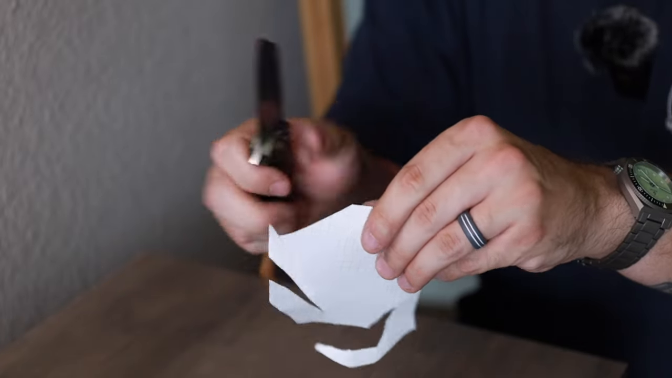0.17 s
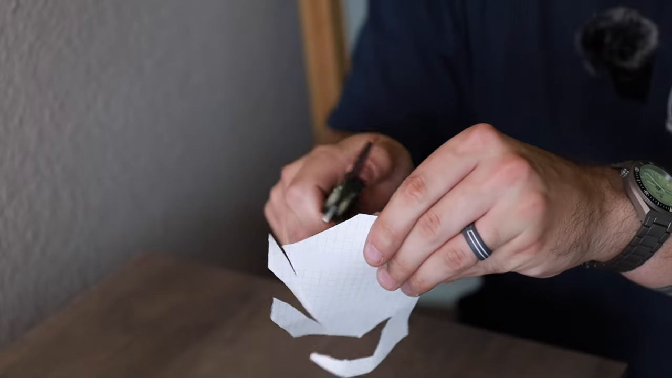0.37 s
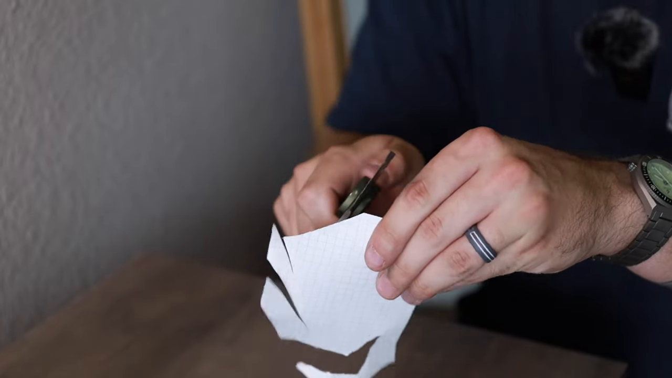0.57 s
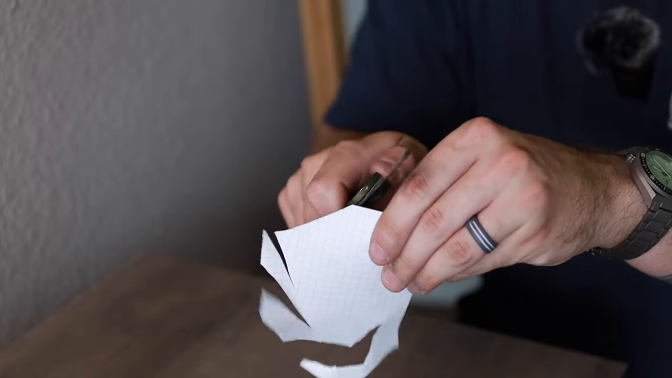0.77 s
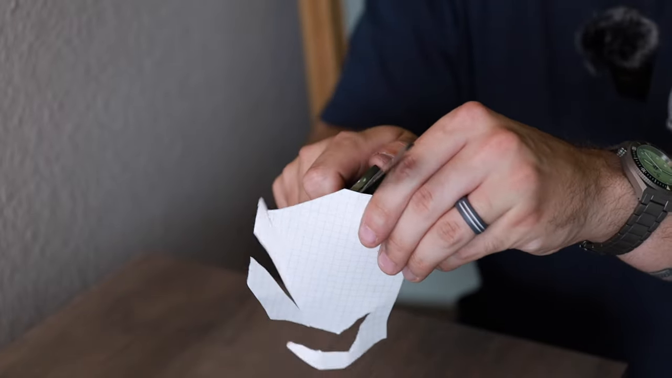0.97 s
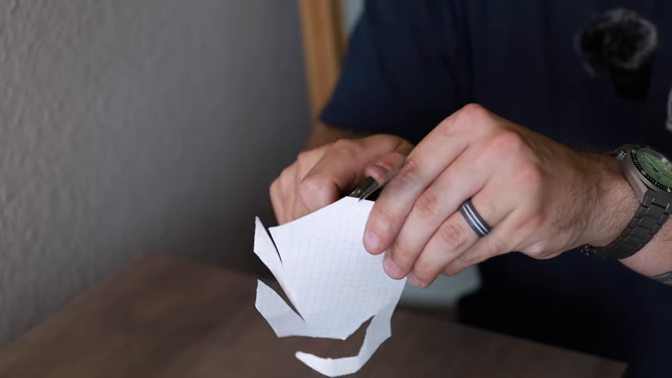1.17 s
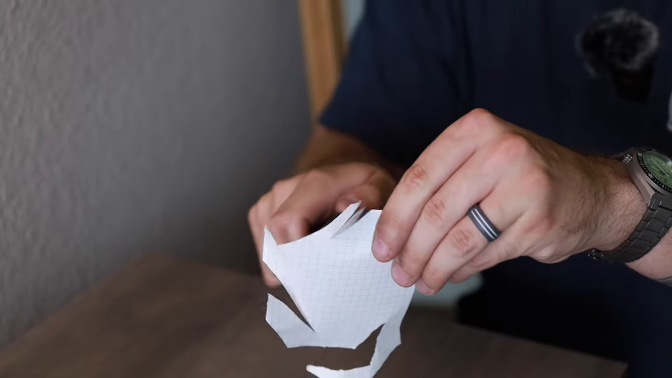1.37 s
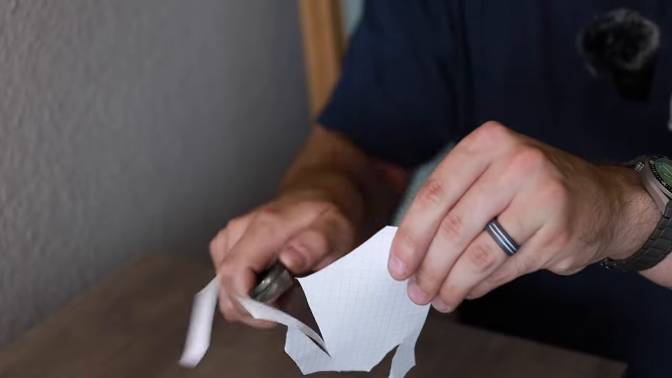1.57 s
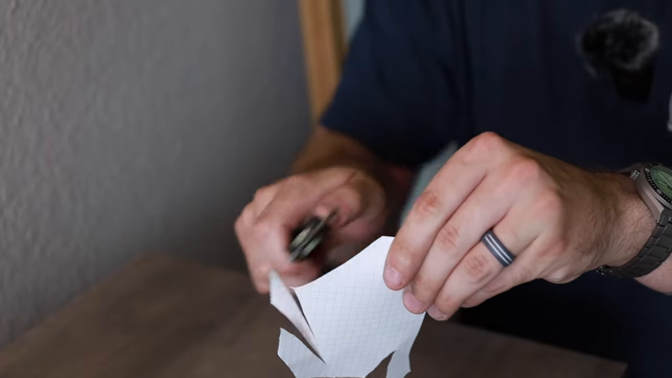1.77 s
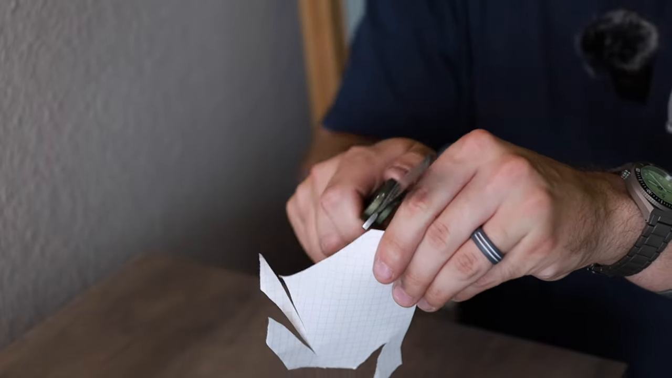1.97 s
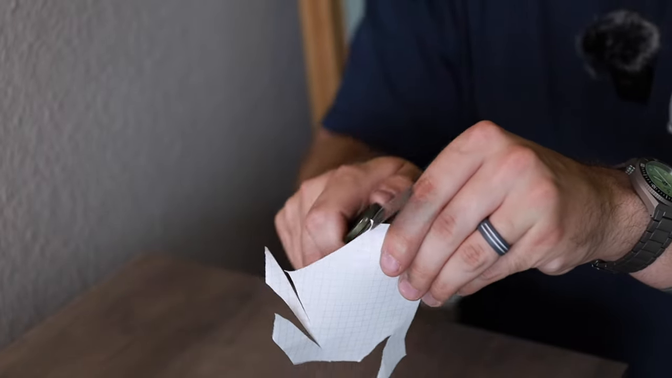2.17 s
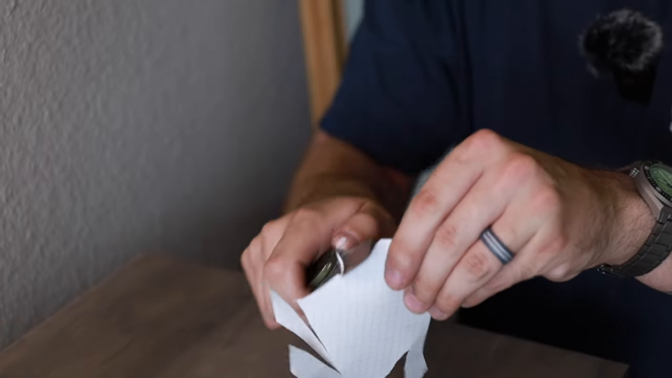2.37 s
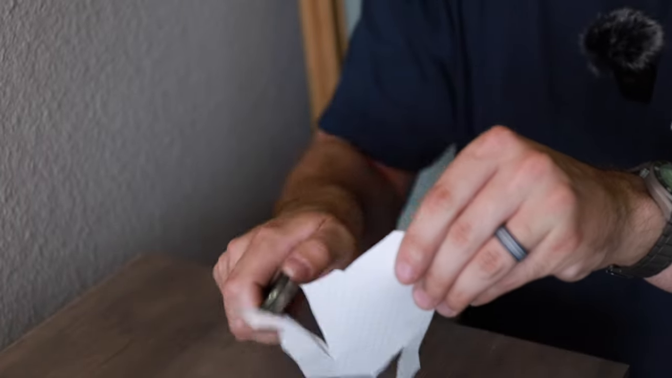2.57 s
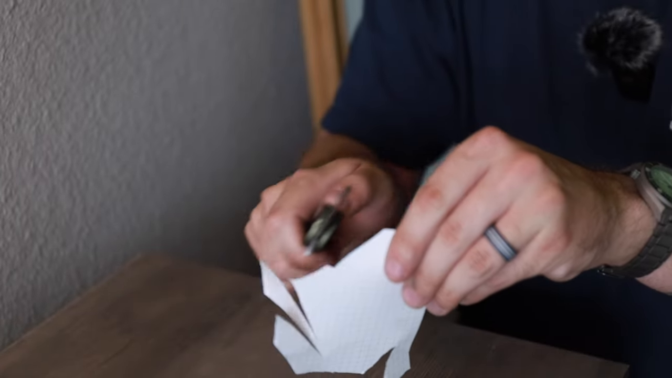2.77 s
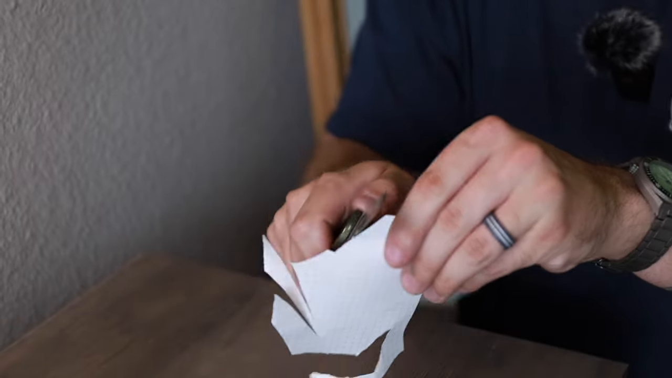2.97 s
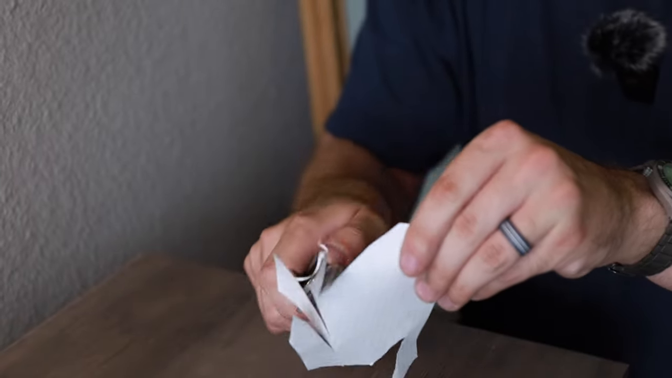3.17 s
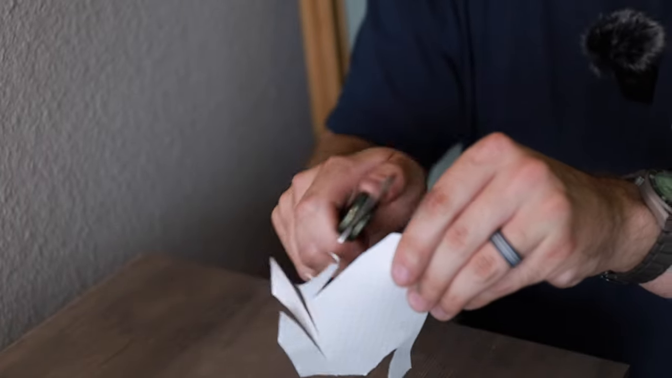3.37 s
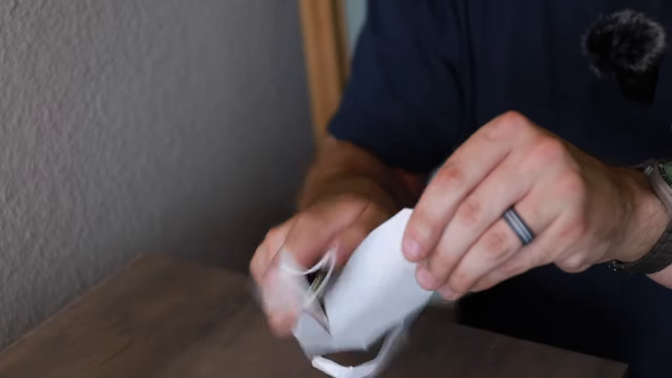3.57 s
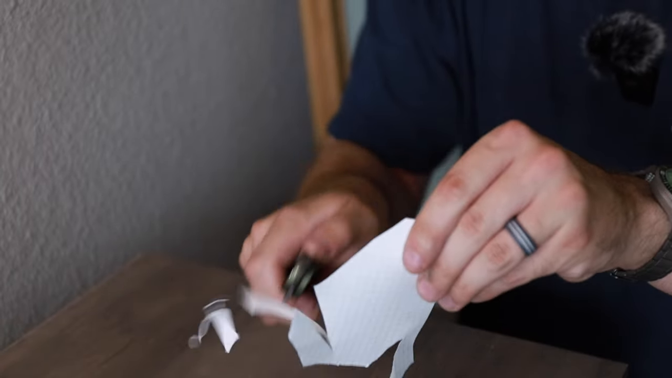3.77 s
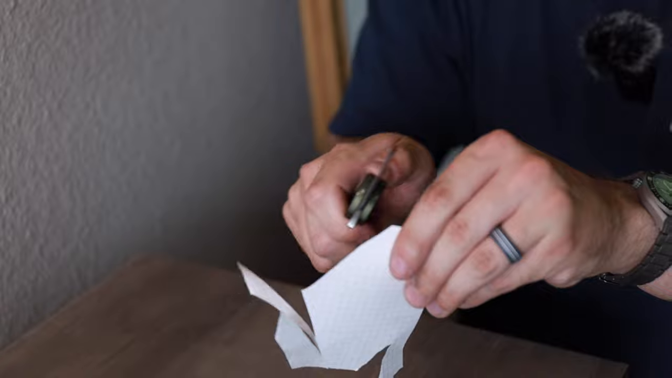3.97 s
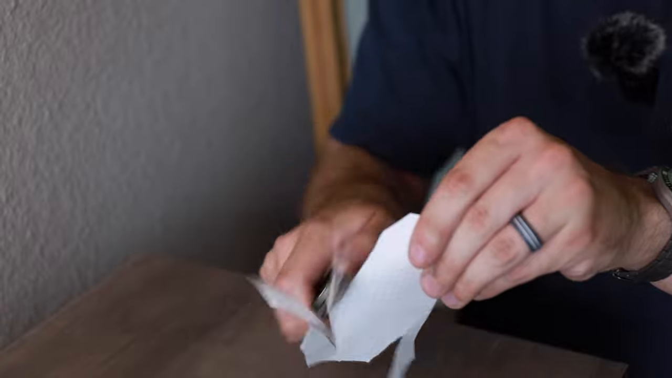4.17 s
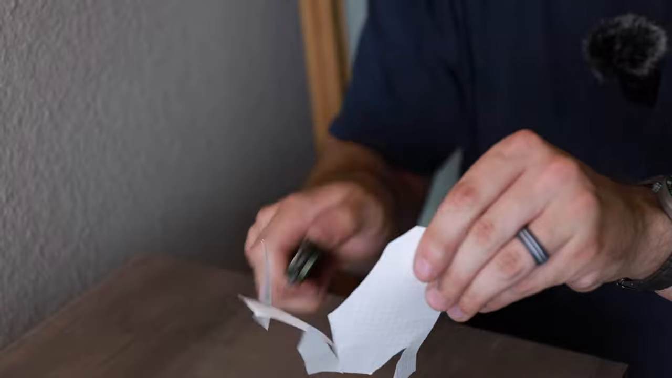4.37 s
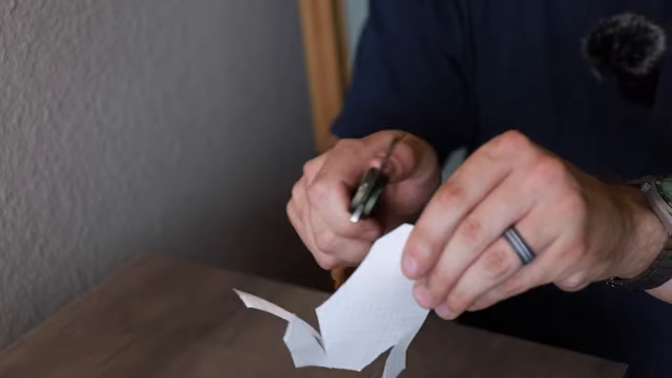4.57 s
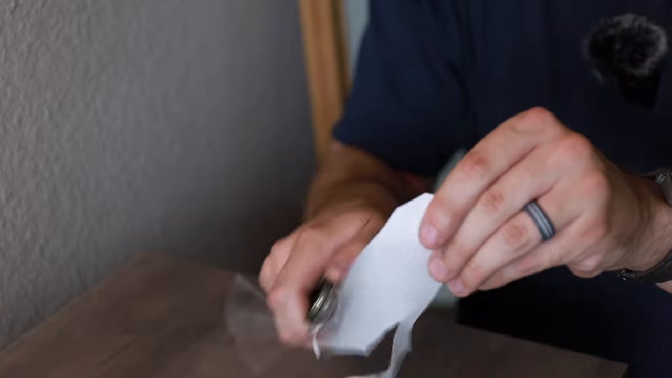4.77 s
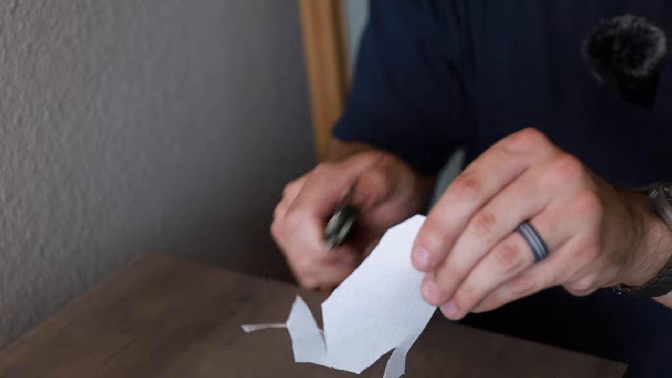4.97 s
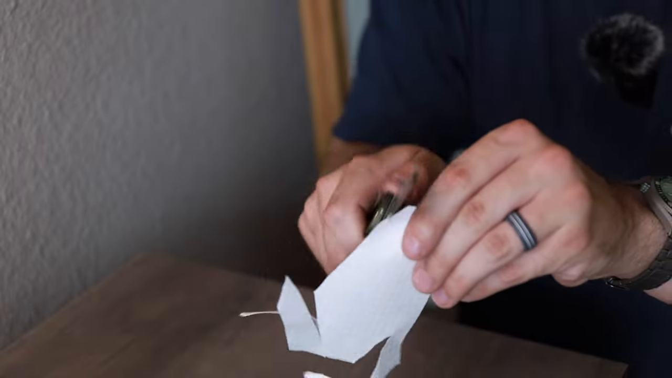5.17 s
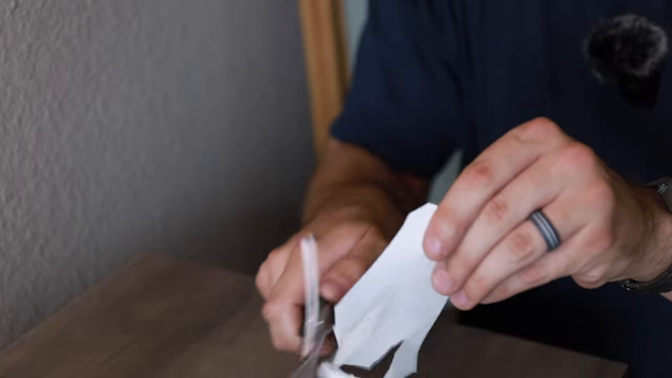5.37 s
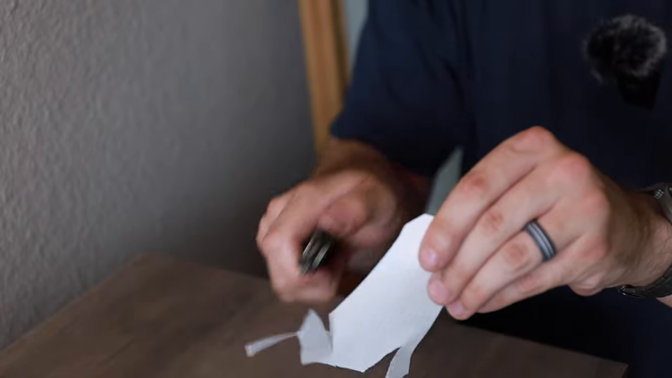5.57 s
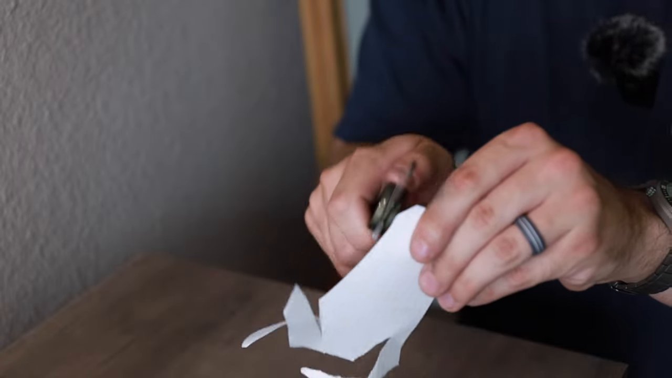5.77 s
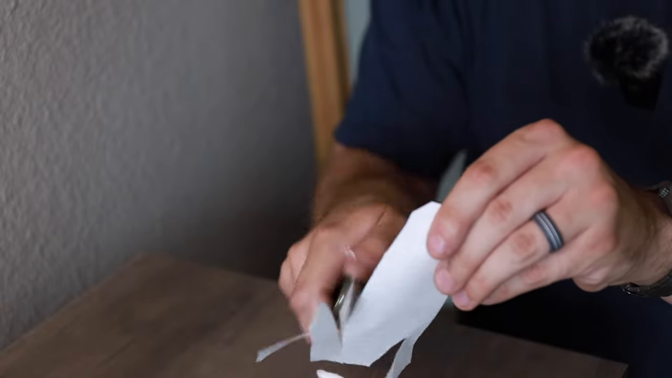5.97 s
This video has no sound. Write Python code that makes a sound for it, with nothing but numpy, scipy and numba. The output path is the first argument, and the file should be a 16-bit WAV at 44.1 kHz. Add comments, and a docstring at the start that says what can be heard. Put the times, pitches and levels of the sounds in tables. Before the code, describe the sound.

Paper is cut again and again by a sharp blade, each bright rasp mixed with small snaps and rustling over a faint hum.

```python
"""Knife slicing paper

A sharp pocket knife slices strips off a hand-held sheet of paper in a small quiet room.
Fibres snap in a dense rasp that rings the sheet and the cupped hands. The freed strips flick and
rustle, fingers rub the paper, and the walls return a short echo over the building's low hum."""
import sys
import numpy as np
from scipy import signal
from scipy.io import wavfile
from scipy.ndimage import uniform_filter1d, map_coordinates
from numba import njit

SR = 44100
rng = np.random.default_rng(int(sys.argv[2]) if len(sys.argv) > 2 else 0)


def generate_wav(signal):
    """Clip the signal to [-1, 1] and save it as 16-bit WAV at the path in sys.argv[1]."""
    frames = np.transpose(np.atleast_2d(signal))
    scaled = np.clip(frames, -1, 1) * 32767
    pcm = np.round(scaled).astype(np.int16)
    wavfile.write(sys.argv[1], SR, pcm)


N = 266055

# Low resonances (pitches that ring easily) of the sheet and cupped hands: f/Hz, width/Hz, level/dB
SHEET_RESONANCES = [(216, 24, -9), (416, 97, -3.5), (695, 173, 5), (1272, 99, 4), (1778, 192, 0),
                    (1954, 143, 0.5)]
# High resonances of the thin strip as it bends: f/Hz, width/Hz, level/dB
STRIP_RESONANCES = [(3500, 680, -3.5), (4500, 460, -17), (5625, 600, 4.5), (6440, 69, -7), (7860, 720, 0.5),
                    (8150, 230, -7), (9800, 660, -25), (10200, 460, 1), (11430, 1060, -1)]
STRIP_DRIFT = .012  # share by which the strip's pitches wander
SPOT_GAP = 37  # samples of delay between neighbouring spots on the paper


def undb(db):
    """Turn decibels into a factor to multiply by."""
    return 10 ** (np.asarray(db) / 20)


def unit(x):
    """Scale a signal to an average power of 1."""
    return x / np.sqrt(np.mean(x ** 2))


@njit
def moving_filter(x, hz):
    """Let one band of pitches through; hz holds its centre and width for every sample."""
    y, mid, low = np.empty(len(x)), 0., 0.
    for i in range(len(x)):
        tuning, damping = np.tan(np.pi * hz[0, i] / SR), hz[1, i] / hz[0, i]
        swing = (mid + tuning * (x[i] - low)) / (1 + tuning * (tuning + damping))
        mid, low = 2 * swing - mid, low + 2 * tuning * swing
        y[i] = damping * swing
    return y


def band(x, hz, width_hz):
    """Keep the pitches around hz; centre and width may be numbers or curves."""
    return moving_filter(x, np.clip(np.array([hz + 0. * x, width_hz + 0. * x]), 10, .45 * SR))


def wander(rate):
    """A smooth random curve, roughly 1 in size, that takes `rate` new values a second."""
    hold = int(SR / rate)
    steps = np.repeat(rng.standard_normal(N // hold + 1), hold)
    return 1.3 * uniform_filter1d(uniform_filter1d(steps, hold), hold)[:N]


def gate_and_curves(tables, edge_s):
    """Make a gate (1 during each table, 0 outside) and a curve for each column after the time."""
    t, rows = np.arange(N) / SR, np.concatenate(tables)
    gate = sum((t >= table[0][0]) * (t < table[-1][0]) for table in tables)
    curves = [np.interp(t, rows[:, 0], column) for column in rows.T[1:]]
    return uniform_filter1d(1. * gate, max(1, int(edge_s * SR))), *curves


def ring(x, resonances, flare_db, rate=30, drift=.045):
    """Resonances, each driven from its own spot, flare up and drift in pitch as the paper bends."""
    out = 0
    for k, (hz, width_hz, db) in enumerate(resonances):
        gain = undb(db + flare_db * np.tanh(wander(rate)))
        out += gain * band(np.roll(x, k * SPOT_GAP), hz * (1 + drift * wander(17)), width_hz)
    return out


def building_hum():
    """Building hum and microphone hiss: bands of noise, three per octave, whose bass wavers."""
    # Strength of the noise from low to high pitch: f/Hz, relative level/dB
    spectrum = [(30, -33), (50, -10), (90, -19), (160, -7.5), (300, -4), (450, -8.5), (800, -14.5),
                (1500, -20), (3000, -26), (8000, -27.5), (15000, -27)]
    out, (freqs, levels_db) = 0, np.transpose(spectrum)
    for hz in 30 * 2 ** (np.arange(28) / 3):
        waver_db = 2.0 * min(1, 300 / hz) * wander(3.68)
        noise = band(band(rng.standard_normal(N), hz, hz / 3), hz, hz / 2)
        out += undb(np.interp(np.log(hz), np.log(freqs), levels_db) + waver_db) * noise
    return undb(-48) * unit(out)


def machine_drone():
    """A machine in the building drones: a narrow, wavering band of noise near 118 Hz."""
    # How the drone swells and fades: t/s, level/dB
    swells = [(0.0, -56), (0.67, -51), (1.16, -52.5), (1.51, -62), (2.6, -56), (3.79, -58.5), (4.85, -58.5),
              (6.03, -58)]
    _, db = gate_and_curves([swells], edge_s=.01)
    return undb(db) * unit(band(band(rng.standard_normal(N), 129.4, 20), 116.6, 15))


def paper_flicks():
    """The paper buckles or is tapped: a short snap, plus a push that rings the sheet and puffs."""
    # One row per flick: t/s, snap peak/dB, snap f/Hz, push/dB and broad crack/dB relative to the snap
    flicks = [(0.0396, -34, 8950, -21, -6), (0.0988, -33, 5630, -5, -1), (0.2083, -38, 8300, -23, -10),
              (0.247, -25.5, 8300, -30, -12), (0.453, -24, 6000, -14, -5), (0.6614, -16, 5930, -9, -22),
              (0.9853, -38, 5640, 1, -7), (1.103, -38, 2280, 0, -18), (1.1192, -27.5, 4840, -6.5, -9),
              (1.1328, -20.5, 7550, -10, -9), (1.6251, -4, 5050, -9.5, -24), (1.8019, -28, 8000, -7.5, 0),
              (2.148, -31, 4500, 0, -8), (2.426, -14.5, 6600, -20, -3), (2.4615, -1.5, 7100, -12, -6),
              (2.4894, -10, 6500, -6.5, -10), (2.5222, -4.5, 6300, -9.5, -9),
              (2.5979, -16.5, 5400, -3, -19), (2.603, -10.5, 3530, -5, -42), (3.025, -17, 5100, -6, -15),
              (3.5846, -24.5, 3870, 3.5, -10), (3.6605, -5, 7500, -9.5, 6), (3.7021, -14, 5100, 2, -24),
              (3.798, -26.5, 5100, -6, -8), (3.9728, -27.5, 3940, -17, -7), (4.1275, -17.5, 3400, 1, -9),
              (4.2444, -1, 9100, -10.5, -15), (4.2948, -13, 4040, -1, -9), (4.3582, -26.5, 4000, -5, -17),
              (4.415, -43.5, 4000, 5, -16), (4.4326, -37, 4200, -6, -19), (4.498, -39, 5950, 0.5, -16),
              (4.6122, -32, 4850, -12, -6), (4.626, -21, 4900, -18, 6), (4.7304, -26, 8100, -11, 0),
              (4.7683, -7, 5940, -12, -13), (4.8047, -2.5, 3830, -23, -12), (5.2301, -21, 6310, 0, 4),
              (5.447, -11.5, 5170, -3.5, -11), (5.643, -42, 5370, -29, -20), (5.8696, -27, 3970, 2.5, -19)]
    fade_s = .022  # time to die away by 60 dB
    snaps, push, t = np.zeros(N), np.zeros(N), np.arange(4096) / SR
    for start_s, db, hz, push_db, crack_db in flicks:
        i = int(start_s * SR)
        burst = rng.standard_normal(len(t)) * np.minimum(t / 0.00035, 1) * 1000 ** (-t / fade_s)
        burst /= np.sqrt(np.sum(burst ** 2) / (fade_s * SR / 14))  # same energy in every burst
        snap = band(burst, hz, 0.19 * hz) + undb(crack_db) * band(burst, 7000, 22000)
        snaps[i:i + len(t)] += (undb(db) * snap / np.abs(snap).max())[:N - i]
        push[i:i + len(t)] += (undb(db + push_db) * burst)[:N - i]
    puff = undb(-7) * band(push, 650, 3300)
    return snaps + undb(10.5) * ring(push, SHEET_RESONANCES, flare_db=4.0) + puff


def fibres(grain_db, catch_db):
    """Fibres snap at every instant, some louder than others, while the edge catches and slips."""
    noise = rng.standard_normal(N)
    return unit(noise * undb(grain_db * rng.exponential(size=N) + catch_db * wander(160)))


def paper_rustle():
    """Fingers and loose strips rub the sheet: a bright, patchy noise that rises and fades."""
    # One row per rub: loudest t/s, level/dB, 20 dB rise/s, 20 dB fade/s, push relative to the rub/dB
    rubs = [(0.22, -44.5, 0.06, 0.026, -15), (0.45, -45.5, 0.11, .01, -4), (0.479, -46, 0.036, 0.051, 1),
            (0.577, -42.5, 0.077, 0.15, -2.5), (0.701, -39.5, 0.027, 0.14, -3),
            (1.584, -39, 0.0076, .07, 11), (2.4, -34.5, 0.0054, 0.058, -6), (2.45, -37, 0.034, .006, -4),
            (2.504, -28, .006, 0.032, 3), (2.535, -37, .006, 0.16, 3), (2.667, -37, 0.068, 0.038, 2.5),
            (3.255, -43.5, 0.0052, 0.076, 7.5), (3.335, -40.5, 0.087, 0.047, -2),
            (3.69, -40, 0.033, 0.026, 14), (3.715, -45, 0.0066, 0.13, 13), (4.285, -34.5, 0.052, 0.027, 8),
            (4.308, -46, 0.0083, 0.073, 12), (4.357, -43, 0.023, .04, 9.5), (4.742, -36.5, 0.018, 0.015, 9),
            (4.827, -28.5, 0.041, 0.072, 8), (5.465, -39.5, 0.011, 0.092, 10)]
    t, gain, push = np.arange(N) / SR, 0, 0
    for peak_s, db, rise_s, fade_s, push_db in rubs:
        rub = undb(db - 20 * np.maximum((peak_s - t) / rise_s, (t - peak_s) / fade_s))
        gain += rub
        push += rub * undb(push_db)
    friction = fibres(grain_db=0.33, catch_db=3.0)
    strip = ring(friction[::-1], STRIP_RESONANCES, flare_db=5.0, rate=32, drift=STRIP_DRIFT)
    bright = band(friction, 5600, 2500) - undb(12.5) * band(friction, 8200, 11000) + undb(8.5) * strip
    return gain * unit(bright) + undb(8.5) * ring(friction * push, SHEET_RESONANCES, flare_db=3.5)


def knife_slices():
    """The blade snaps fibres in a rasp that rings the cut edge, the thin strip and the sheet."""
    # One list of points per slice: t/s, rasp level/dB, taut (tight) paper relative to the rasp/dB
    slices = [
        [(1.12, -43, 0), (1.178, -35.5, -4), (1.224, -28, -2), (1.35, -26.5, -6.5), (1.43, -16, -6),
         (1.522, -16, -16), (1.558, -12.5, -5), (1.576, -14, -5), (1.582, -29, -3)],
        [(2.146, -35, -7), (2.152, -30.5, -3), (2.244, -29, -3), (2.28, -25.5, -10), (2.308, -23, -3),
         (2.388, -20, -9), (2.396, -28, -3)],
        [(2.45, -26, -4), (2.46, -19, -2.5), (2.492, -13.5, -9), (2.5, -22, -9)],
        [(3.025, -30, -4), (3.069, -20.5, -6.5), (3.189, -14.5, -10), (3.235, -22.5, 1), (3.252, -35.5, 4)],
        [(3.592, -34, -7), (3.608, -17.5, -7), (3.632, -19, -12), (3.644, -26, -5)],
        [(3.648, -24, -11), (3.66, -9.5, -11), (3.666, -11.5, -26)],
        [(4.127, -25.5, -17), (4.155, -14, -6), (4.179, -13, -12.5), (4.207, -16, -8.5), (4.237, -15.5, -15),
         (4.245, -16.5, -5), (4.257, -11.5, -14), (4.263, -28, -2)],
        [(4.748, -33, -13), (4.756, -17, -9.5), (4.808, -11.5, -13.5), (4.812, -20, -1)],
        [(5.232, -38, 5), (5.238, -26.5, -13.5), (5.266, -21, 1), (5.284, -16, -12), (5.304, -16.5, -0.5),
         (5.37, -17, -9), (5.414, -10, -11.5), (5.43, -26.5, 1), (5.452, -25, -9), (5.456, -29, -5)],
        [(5.882, -29, -10), (5.89, -27, -8), (5.914, -23, -0.5), (5.938, -19.5, -6), (6.018, -17, -11),
         (6.03, -10.5, -11)],
    ]
    # How the sheet is held in each slice: slack paper/dB and hiss/dB relative to the rasp,
    # middle edge resonance start f/Hz and end f/Hz, upper taut resonances relative to the lowest/dB
    grips = [(-12.5, -14, 5600, 6800, 1), (-12.5, -13, 5600, 6400, 0.5), (-9, -11, 5600, 8900, -2),
             (-14.5, -11.5, 5700, 7000, 3), (-10.5, -8, 6400, 6070, -1), (-8.5, -13, 12000, 2700, -4),
             (-15, -10, 5200, 7300, -1), (-15, -12, 6300, 6000, -4), (-13.5, -9.5, 5900, 7500, -2),
             (-16, -9, 5900, 6300, -1.5)]
    # Low, middle and high resonance of the cut edge: width/Hz, level/dB
    edge_resonances = [(800, 2.5), (1400, 2), (2000, 3)]
    t = np.arange(N) / SR
    ends_s = [s for points in slices for s in (points[0][0], points[-1][0])]

    def per_slice(start, end):
        """Glide from a start value to an end value during each slice."""
        return np.interp(t, ends_s, np.ravel([start, end], "F"))

    gate, rasp_db, taut_db = gate_and_curves(slices, edge_s=0.0023)
    gain = gate * undb(rasp_db)
    force_db = rasp_db + 20  # 0 for an average cut
    slack_db, hiss_db, start_hz, end_hz, upper_db = np.transpose(grips)
    slack_db = per_slice(slack_db, slack_db) - 0.36 * force_db  # slack paper grows less than the rasp
    hiss_db = per_slice(hiss_db, hiss_db) - wander(20)
    upper_db = taut_db + per_slice(upper_db, upper_db)
    low_hz = (3740 + 26 * force_db) * (1 + .04 * wander(15))  # harder cutting tightens the edge
    edge_hz = low_hz, per_slice(start_hz, end_hz), 9680 * (1 + .04 * wander(13))

    cut, strip = fibres(grain_db=0.79, catch_db=2.0), fibres(grain_db=1.5, catch_db=1.5)
    rasp = sum((-1) ** k * undb(db) * band(cut, edge_hz[k], width_hz)
               for k, (width_hz, db) in enumerate(edge_resonances))
    rasp += undb(-2.0) * ring(strip, STRIP_RESONANCES, flare_db=5.0, rate=37, drift=STRIP_DRIFT)
    echo_s = .0011 * (1 + .07 * wander(4))  # the rasp bounces off the moving hand
    rasp += undb(-12) * map_coordinates(rasp, [(t - echo_s) * SR])
    # Even out the level: the blade's power only moves from one resonance to another.
    rasp /= np.sqrt(uniform_filter1d(rasp ** 2, int(0.028 * SR)))
    hiss = undb(hiss_db) * unit(band(band(np.roll(cut, SPOT_GAP), 13800, 6500), 13800, 6500))

    push = cut * gain  # the gain comes first, so the sheet rings on after the blade stops
    slack = ring(push * undb(slack_db), SHEET_RESONANCES[:3], flare_db=5.0)
    taut = ring(push * undb(taut_db), SHEET_RESONANCES[3:4], flare_db=3.0)
    taut += ring(cut[::-1] * gain * undb(upper_db), SHEET_RESONANCES[4:], flare_db=5.0)
    return gain * (rasp + hiss) + undb(14.0) * slack + undb(12.5) * taut


@njit
def wall_echoes(x, delays, gain, dulling):
    """Sound bounces between walls: eight echo paths feed each other, duller on every round."""
    paths, echo, out = np.zeros((8, 4096)), np.zeros(8), np.zeros(len(x))
    for i in range(len(x)):
        total = 0.
        for k in range(8):
            echo[k] += (1 - dulling) * (gain[k] * paths[k, (i - delays[k]) & 4095] - echo[k])
            total += echo[k]
            out[i] += echo[k] * (1 - 2 * (k % 2))  # add and subtract in turn
        for k in range(8):
            paths[k, i & 4095] = x[i] + echo[k] - total / 4
    return out


def scene():
    """Mix the close paper sounds, their echo, the hum and the drone into one channel."""
    paper = knife_slices() + paper_rustle() + paper_flicks()
    delays = np.array([431, 563, 709, 887, 1063, 1259, 1481, 1723])  # samples
    fade_s = 0.42  # time for the echo to die away by 60 dB
    room = wall_echoes(paper + 1e-18, delays, undb(-60 * delays / SR / fade_s), dulling=.2)
    return (paper + undb(-21.5) * room + building_hum() + machine_drone())[None]


def record(dry):
    """Cut the treble above 16100 Hz and clip any snap that passes full scale."""
    treble_cut = signal.ellip(10, .2, 70, 16100, fs=SR, output="sos")
    return signal.sosfilt(treble_cut, dry).clip(-1, 1)


dry = scene()
out = record(dry)
generate_wav(out)
```